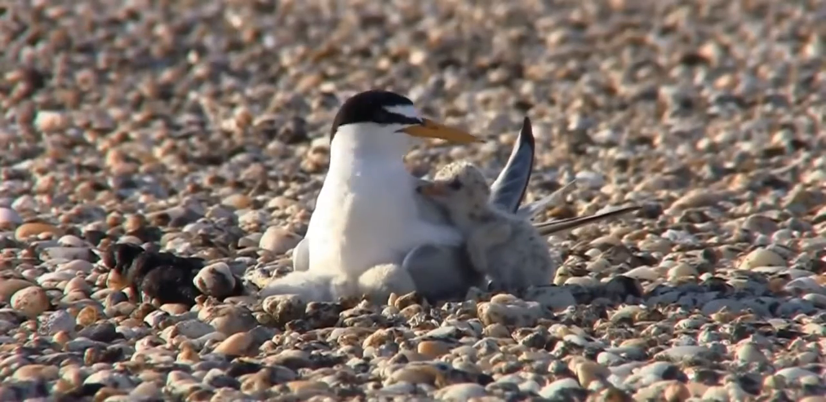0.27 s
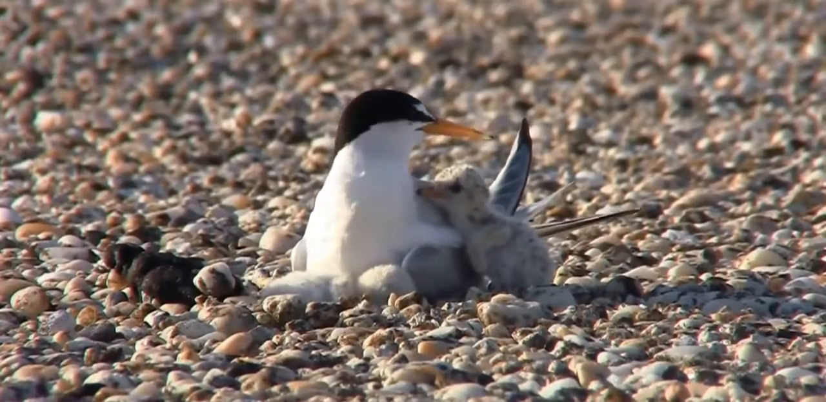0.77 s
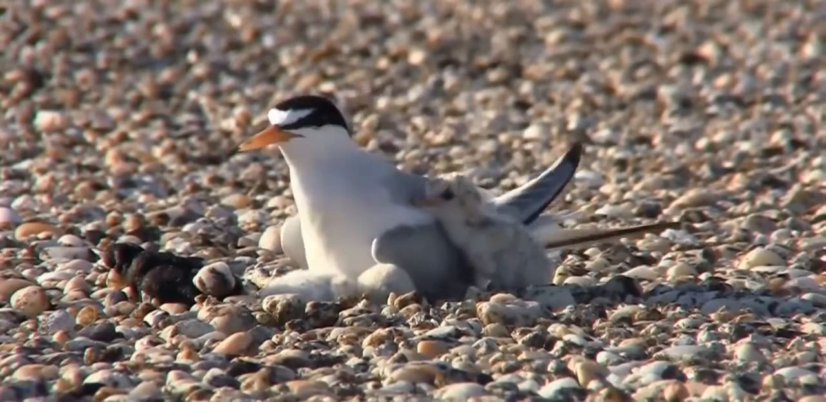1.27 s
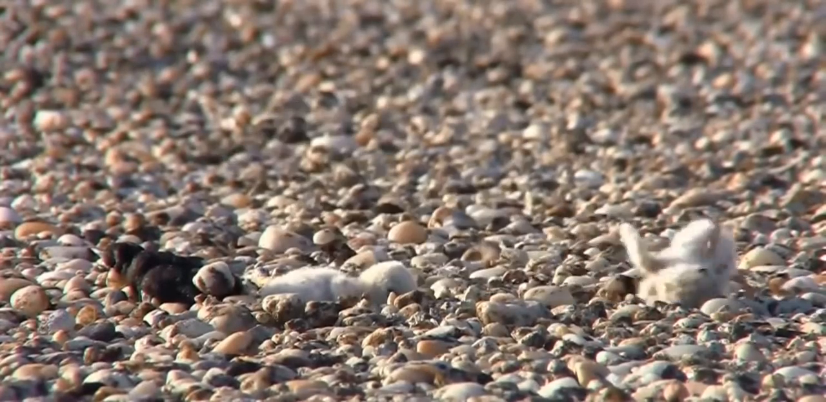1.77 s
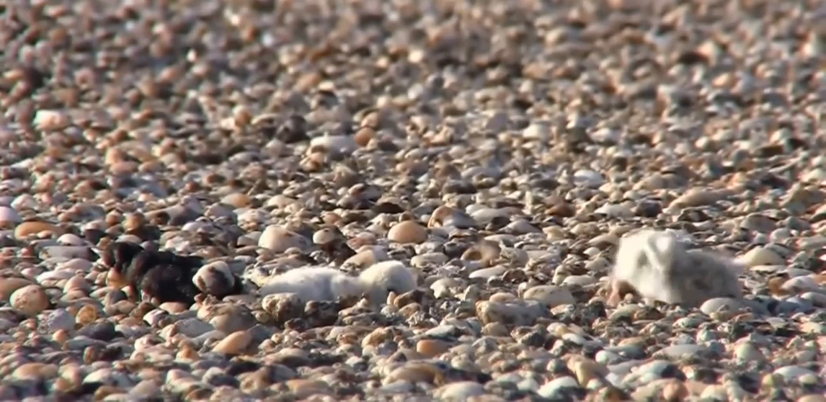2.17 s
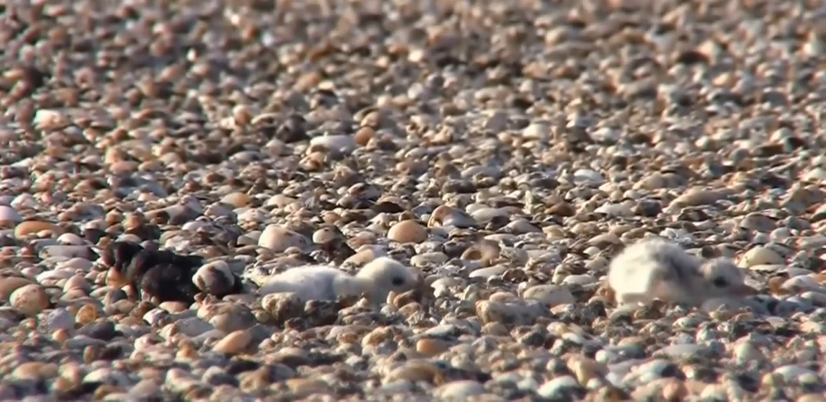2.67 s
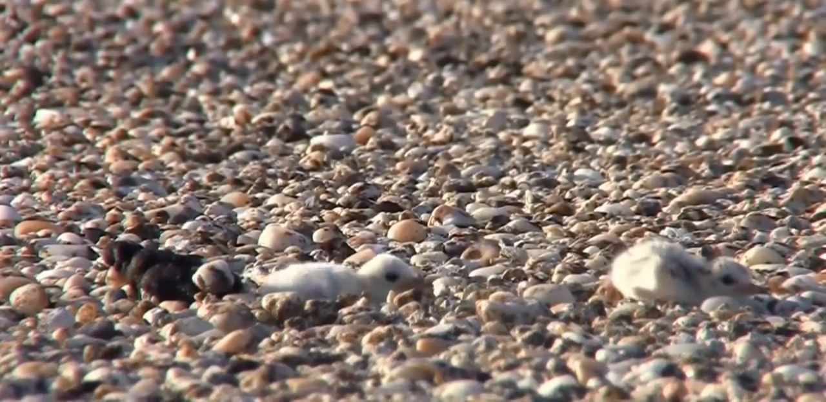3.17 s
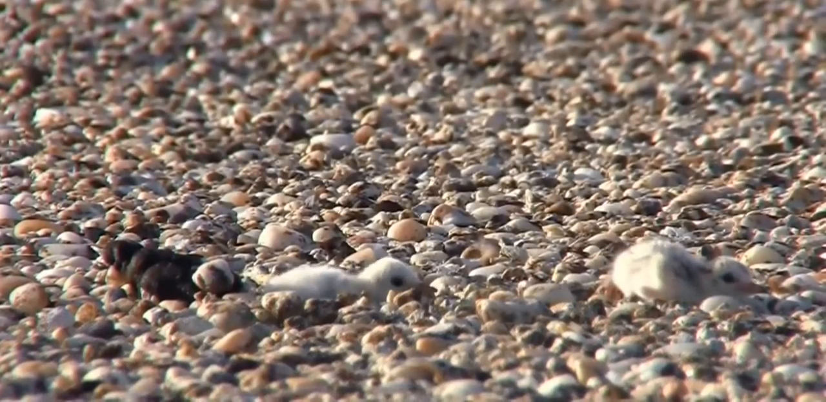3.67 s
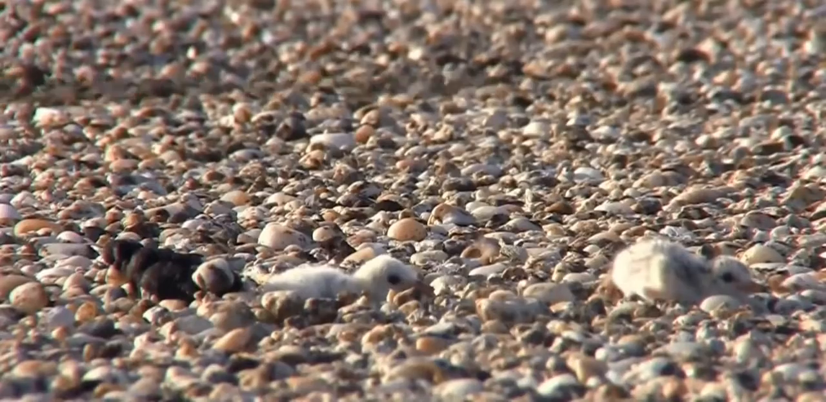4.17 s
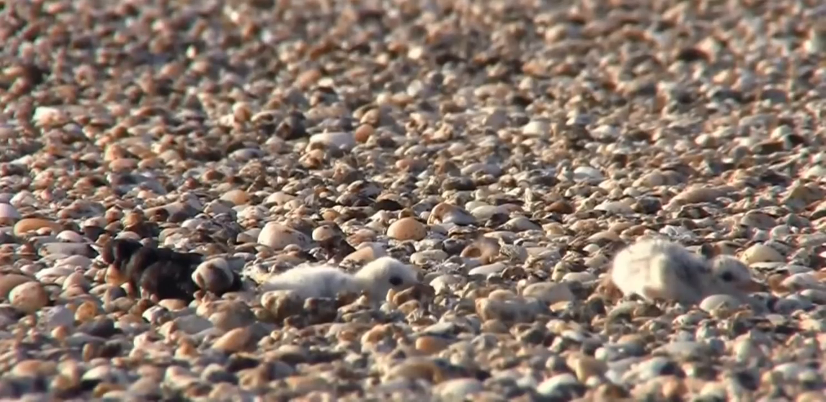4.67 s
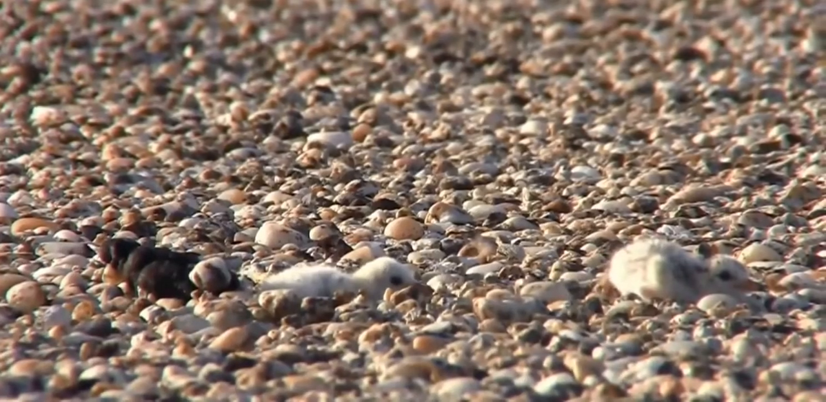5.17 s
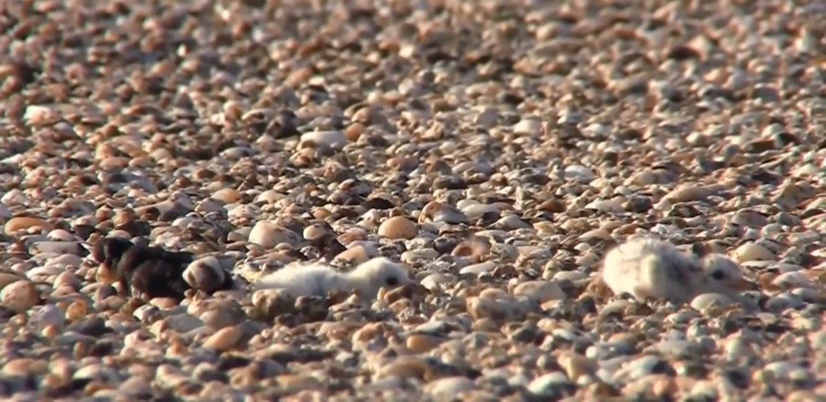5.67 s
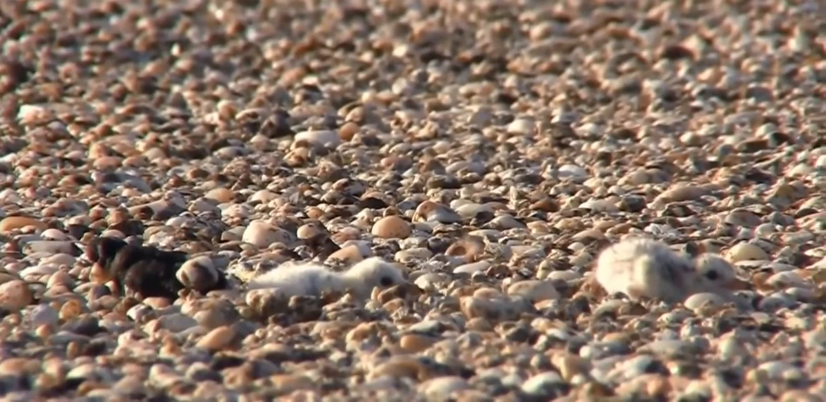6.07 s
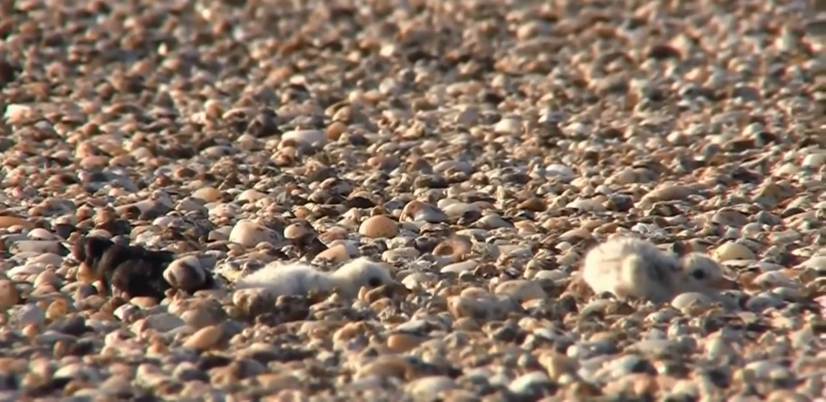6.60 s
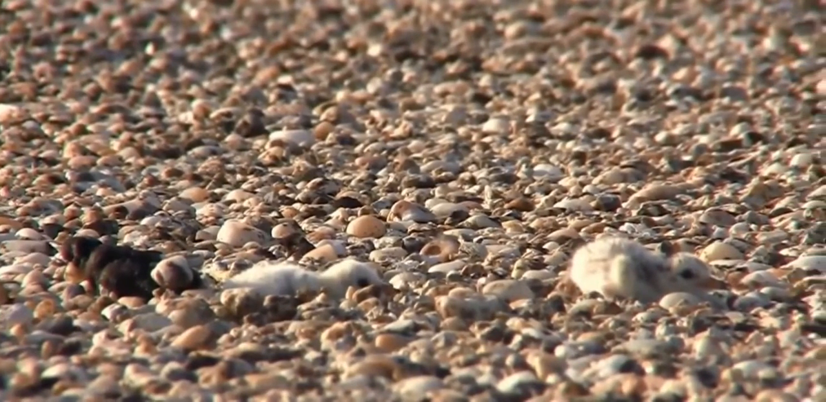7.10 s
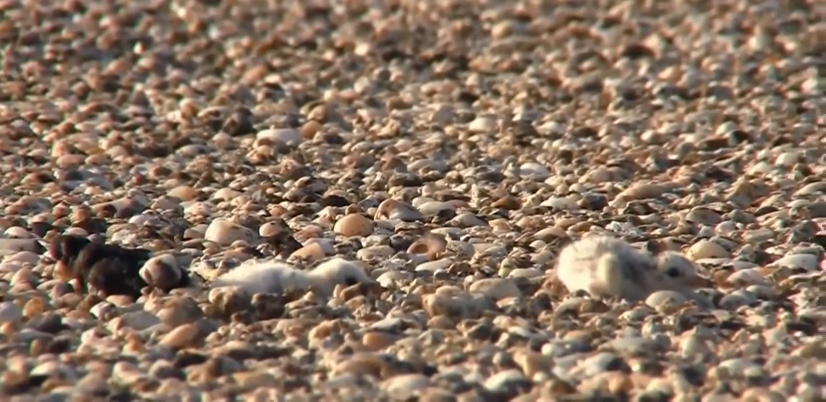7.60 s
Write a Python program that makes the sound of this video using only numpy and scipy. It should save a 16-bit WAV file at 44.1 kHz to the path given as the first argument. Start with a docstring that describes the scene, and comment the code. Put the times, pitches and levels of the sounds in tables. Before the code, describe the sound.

A shingle beach in the open, heard in mono for about eight seconds. A steady, dark distant surf rush with a faint low hum lies under everything, with lumpy wind buffeting that swells near 0, 0.8, 1.3, 4.4 and 7 s. A close tern gives two brief, bright, arched barks at 0.3 and 0.7 s. A gap follows, with faint chips near 1.9 s. From 2.1 s tiny high chirps arrive, with a strong pair near 2.55 s and faint echoes just after. Calls scatter through 3-4 s, then crowd together from 4.2 to 5 s, peaking sharply around 4.75 s. More bright bursts come at 5.7 and 6.4 s, thinning to separate chirps until 7.8 s. Squeaky whistles jump to low raspy croaks, with quick buzzy sweeps at their edges. From 2.4 s, faint runs of fast, even metallic ticks come and go.

```python
"""Small terns over a shingle beach

Terns chirp near and far: short arched notes that jump between registers, with fast buzzy sweeps
at pauses; two notes return as faint echoes, and the nearest bird barks twice. Each voice is a sum
of harmonics coloured by the windpipe. Behind them are a steady distant rush of surf with a faint
hum, made of filtered noise, lumpy low wind noise on the microphone, and runs of small ringing
metallic ticks, probably the lens motor."""
import sys
import numpy as np
from scipy import signal
from scipy.fft import rfft, irfft
from scipy.io import wavfile
from scipy.ndimage import uniform_filter1d

SR = 44100
rng = np.random.default_rng(int(sys.argv[2]) if len(sys.argv) > 2 else 0)


def digitize_waveform(pressure):
    """Quantize a signal to 16-bit integers and store it at the path in sys.argv[1].

    Rows of a 2-D input are taken as channels; values are limited to [-1, 1].
    """
    field = np.atleast_2d(pressure).T
    bounded = np.clip(field, -1, 1)
    quanta = np.round(bounded * 32767).astype(np.int16)
    wavfile.write(sys.argv[1], SR, quanta)


def linear_from_db(decibels):
    """Turn decibels (scalar or array-like) into linear amplitude factors; 0 gives 1."""
    return 10 ** (np.asarray(decibels, float) / 20)


N = 345744


def evened(x):
    """Scales a sound to rms 1."""
    return x / np.sqrt(np.mean(x ** 2) + 1e-20)


def read(points, hz):
    """Reads a spectrum table on a log-frequency axis."""
    f, value = np.transpose(points)
    return np.interp(np.log(hz + 1), np.log(f + 1), value)


def add(mix, s, sound):
    """Mixes a sound in at s seconds."""
    part = mix[max(round(s * SR), 0):][:len(sound)]
    part += sound[:len(part)]


def coloured(points):
    """Steady noise of rms 1 with a given spectrum."""
    spectrum = rfft(rng.standard_normal(N))
    return evened(irfft(spectrum * linear_from_db(read(points, np.fft.rfftfreq(N, 1 / SR))), N))


def narrow(x, hz, width_hz):
    """Keeps a bell-shaped band."""
    f = np.fft.rfftfreq(len(x), 1 / SR)
    return irfft(rfft(x) / (1 + (2 * (f - hz) / width_hz) ** 2), len(x))


# Colour of the distant surf. Each row: frequency in Hz, relative density in dB per Hz.
SURF_COLOUR = [(18, -50), (30, -48), (108, -7), (160, -6.5), (197, -4.5), (256, -8), (532, -11.5),
               (1010, -20), (1900, -35.5), (4000, -33.5), (6720, -39.5), (10000, -51), (15500, -63.5)]
SURF_DB = -24
# Fuzzy hums in the rush. Each row: centre in Hz, width in Hz, level in dB.
HUMS = [(193, 6.4, -30), (1053, 3.1, -44.5)]


def surf():
    """A distant steady rush of coloured noise, with narrow noise bands as hums."""
    mix = linear_from_db(SURF_DB) * coloured(SURF_COLOUR)
    for hz, width_hz, db in HUMS:
        mix += linear_from_db(db) * evened(narrow(rng.standard_normal(N), hz, width_hz))
    return mix


# Colour of wind at the microphone. Each row: frequency in Hz, relative density in dB per Hz.
WIND_COLOUR = [(15, -4.5), (50, 8.5), (110, 11), (160, 6), (300, -66)]
# Gusts at the microphone. Each row: time of the peak in seconds, height over the breeze in dB.
GUSTS = [(.06, 11.5), (.78, 8), (1.32, 10.5), (4.35, 12), (4.95, 5.5), (7.05, 5.5)]
BREEZE_DB, GUST_S, LUMP_DB = -28.5, 0.14, 1.44


def wind():
    """Low buffeting: noise whose level wanders in lumps and rises in a few bell-shaped gusts."""
    lumps = rng.standard_normal(N)
    for _ in range(2):
        lumps = uniform_filter1d(lumps, 2000)
    t = np.arange(N) / SR
    gusts_db = sum(db * np.exp(-((t - s) / GUST_S) ** 2) for s, db in GUSTS)
    return linear_from_db(BREEZE_DB + gusts_db + LUMP_DB * evened(lumps)) * coloured(WIND_COLOUR)


# Runs of ticks. Each row: first tick in seconds, last tick in seconds.
TICK_RUNS = [(2.422, 2.523), (2.799, 2.945), (3.02, 3.27), (3.513, 4.017), (4.085, 4.34), (4.464, 4.665),
             (4.836, 4.937), (5.061, 5.412), (5.486, 5.587), (5.856, 6.11), (6.387, 6.535), (6.61, 6.661),
             (6.808, 6.96), (7.03, 7.081), (7.234, 7.384), (7.607, 7.708)]
# Rings of the small metal parts. Each row: frequency in Hz, relative level in dB.
TICK_MODES = [(5510, -6), (6420, -8), (7190, -5), (8240, -7), (8970, -8)]
TICK_T60_S, BLOW_T60_S = 0.09, 0.034  # time to fall by 60 dB
TICK_GAP_S = 0.05  # adjusted to fit whole steps into a run
TICK_GAIN_DB, TICK_SCATTER_DB = -41, 2


def ticks():
    """Evenly stepped blows on small metal parts: a short noisy rattle and a few fuzzy decaying rings."""
    mix, t = np.zeros(N), np.arange(3000) / SR
    for first, last in TICK_RUNS:
        for s in np.linspace(first, last, round((last - first) / TICK_GAP_S) + 1):
            blow = rng.standard_normal(len(t)) * linear_from_db(-60 * t / BLOW_T60_S)
            rattle = narrow(blow, 5500, width_hz=4700)
            rings = np.zeros(len(t))
            for hz, db in TICK_MODES:
                rings += linear_from_db(db - 60 * t / TICK_T60_S) * np.sin(2 * np.pi * (hz * t + rng.random()))
            # the start of the noisy blow drives the rings and makes them fuzzy
            jolts = signal.fftconvolve(rings, blow[:400] / np.linalg.norm(blow[:400]))[:len(t)]
            gain_db = TICK_GAIN_DB + TICK_SCATTER_DB * rng.standard_normal()
            add(mix, s, linear_from_db(gain_db) * (jolts + 3.4 * rattle))
    return mix


ECHO_DB, ECHO_T60_S = -14, 0.4  # gain of the scatter, time to fall by 60 dB


def echoes(x):
    """Scatter from dunes and shingle: a noisy tail that decays."""
    t = np.arange(SR // 2) / SR
    tail = rng.standard_normal(len(t)) * linear_from_db(-60 * t / ECHO_T60_S) * (t > 0.004)
    return linear_from_db(ECHO_DB) * signal.fftconvolve(x, tail / np.linalg.norm(tail))[:N]


# The windpipe's colour on every harmonic. Each row: frequency in Hz, relative level in dB.
THROAT = [(1000, -14), (1900, -12.5), (2600, -5.5), (3700, 4), (4800, -2), (5800, -9.5), (6700, -15.5),
          (7600, -20.5), (10000, -36), (15000, -50)]
PITCH_SHAKE = 0.07  # share of the pitch, at full roughness
BROKEN_DB = 14  # at full roughness each harmonic comes and goes by this much


def voiced(hz, rough, bright_db, odd_db=0, first_db=0):
    """Harmonics of a pitch curve through the windpipe; roughness shakes pitch and level and breaks them.

    bright_db tilts the colour per octave; odd_db and first_db lift odd harmonics and the first."""
    shake = rng.standard_normal((32, len(hz)))
    shake = evened(signal.fftconvolve(shake, np.hanning(90)[None], "same", axes=1))
    turns = np.cumsum(hz * (1 + PITCH_SHAKE * rough * shake[0])) / SR
    k = np.arange(1, 31)[:, None]  # harmonic numbers
    colour_db = read(THROAT, k * hz) + bright_db * np.log2(k * hz / 3700)
    colour_db += odd_db * (k % 2) + first_db * (k == 1)
    colour_db += BROKEN_DB * rough * shake[2:]
    waves = np.cos(2 * np.pi * (k * turns + rng.random(k.shape)))
    voice = (linear_from_db(colour_db) * (k * hz < 15500) * waves).sum(0)
    return evened(voice) * (1 + rough * shake[1])


# Barks of the nearest bird. Each row: start in seconds, length in seconds, top pitch in Hz,
# level in dB before the arch.
BARKS = [(0.29, 0.04, 1197, -11.5), (0.692, 0.042, 1160, -13.5)]
BARK_SLACK = 0.42  # pitch at both ends as a share of the top
BARK_ECHO_DB = -14  # on top of the echo gain: the nearest bird is the driest


def barks():
    """One arch of pitch and level in the low register, brightened by the wide-open bill."""
    mix = np.zeros(N)
    for s, length, top_hz, db in BARKS:
        arch = np.sin(np.linspace(0, np.pi, round(length * SR)))
        hz = top_hz * (BARK_SLACK + (1 - BARK_SLACK) * arch)
        add(mix, s, linear_from_db(db) * arch * voiced(hz, rough=0.094, bright_db=4.5))
    return mix + echoes(linear_from_db(BARK_ECHO_DB) * mix)


SWEEP_ROUGH, SWEEP_SPREAD = 0.2, 0.1  # the spread shifts each sweep's pitch by chance, as a share
SWEEP_DULL_DB = -1.5  # dB per octave: the bill is not yet open
FLIP_ODD_DB = -24  # odd harmonics drop away, so the voice flips up an octave


def sweep(low_hz, high_hz, length, bright_db):
    """A glide from slack to tight membranes: buzzy, flips register, levels off and is cut short."""
    u = np.linspace(0, 1, round(length * SR))
    spread, flip = rng.uniform(-1.018, 1, 2)
    swell = np.sin(np.pi * u ** 2.6).clip(0) ** 0.8
    hz = (low_hz + (high_hz - low_hz) * np.sin(np.pi / 2 * u)) * (1 + SWEEP_SPREAD * spread)
    odd_db = FLIP_ODD_DB * np.clip((u - 0.55 - 0.4 * flip) / 0.15, 0, 1)
    return voiced(hz, SWEEP_ROUGH, bright_db + SWEEP_DULL_DB, odd_db) * swell


# Notes of the birds near and far; the rows at 2.649 and 2.686 are faint echoes of the notes at
# 2.537 and 2.571. Each row: nominal start in seconds, nominal length in seconds, pitch at the
# middle in Hz before the droop, glide from start to end in Hz, level in dB before the swell.
CHIRPS = [(1.833, 0.012, 1990, 150, -34.5), (1.882, 0.016, 1960, -50, -36), (2.113, 0.015, 3500, -450, -19),
          (2.164, 0.011, 3700, -60, -14.5), (2.196, 0.034, 3450, -650, -30),
          (2.249, 0.028, 1940, 124, -27.5), (2.537, 0.014, 3750, -450, -8), (2.571, 0.025, 3266, 200, -12),
          (2.582, 0.016, 1267, 380, -18.5), (2.604, 0.01, 3460, 197, -25), (2.613, 0.0076, 1945, -700, -20),
          (2.649, .014, 3770, -200, -44), (2.686, 0.023, 3300, 138, -43), (2.779, 0.011, 2093, 398, -22.5),
          (2.786, 0.011, 2750, -300, -26.5), (2.824, 0.028, 3350, -340, -13),
          (2.852, 0.015, 1950, -120, -19.5), (2.866, 0.013, 1330, -300, -28),
          (3.042, 0.052, 3420, -150, -42), (3.185, 0.0092, 915, 22, -21), (3.23, 0.021, 3744, 260, -13),
          (3.278, 0.015, 2750, -180, -25), (3.331, 0.015, 2470, -300, -27),
          (3.462, 0.013, 3530, -630, -16.5), (3.511, 0.008, 3660, 200, -16.5),
          (3.566, 0.022, 3700, -400, -19.5), (3.599, 0.042, 1890, -150, -29.5),
          (3.645, .06, 3600, -54, -37), (3.745, 0.039, 3520, -100, -33.5),
          (3.918, 0.0099, 2790, 192, -27.5), (3.967, 0.024, 2560, -400, -31),
          (4.243, 0.01, 3610, -220, -18.5), (4.292, 0.013, 3560, -200, -16.5),
          (4.419, 0.0086, 3420, -500, -25.5), (4.463, 0.014, 3480, 13, -24),
          (4.475, 0.0086, 3340, -350, -15), (4.521, 0.019, 3450, 130, -14), (4.529, 0.017, 1930, -210, -22),
          (4.557, 0.02, 2030, -210, -23.5), (4.594, 0.05, 3690, -380, -17),
          (4.611, 0.014, 2630, -53, -27.5), (4.635, 0.016, 2160, 221, -19.5), (4.639, 0.0068, 3430, 0, -16),
          (4.665, 0.034, 2690, -100, -26.5), (4.686, 0.0083, 3630, -260, -13),
          (4.732, 0.01, 3750, -430, -6), (4.778, 0.015, 2080, 450, -19), (4.783, .011, 2560, 152, -19),
          (4.796, 0.0094, 3650, 100, -9), (4.806, 0.0067, 1916, -330, -13),
          (4.821, 0.14, 3670, -200, -25.5), (4.966, 0.019, 3470, 29, -17.5), (5.117, 0.01, 3370, 105, -22),
          (5.147, 0.034, 1240, -110, -23.5), (5.348, 0.028, 1020, -120, -24),
          (5.41, 0.046, 3425, -260, -17.5), (5.624, 0.0089, 3800, -450, -13),
          (5.67, 0.0092, 3520, -200, -16.5), (5.69, 0.0084, 3880, -300, -11),
          (5.7, 0.011, 1860, -53, -14.5), (5.742, 0.045, 3770, -310, -8.5),
          (5.744, 0.021, 2570, -420, -29.5), (5.783, 0.011, 2530, -250, -29),
          (5.787, 0.025, 1012, -440, -19.5), (5.864, 0.0065, 2140, -200, -18),
          (5.906, 0.011, 2176, 78, -18.5), (6.369, 0.0059, 2470, -400, -24),
          (6.406, 0.015, 3830, 70, -16.5), (6.439, 0.015, 1915, -150, -11.5),
          (6.496, 0.044, 3690, -320, -13.5), (6.539, 0.026, 1016, -200, -19.5),
          (6.566, 0.011, 1380, -210, -22), (6.585, 0.049, 3300, -320, -24),
          (6.632, 0.021, 3440, -540, -28.5), (6.687, 0.025, 3600, -290, -24.5),
          (6.741, 0.017, 3610, -2, -23), (6.758, 0.016, 3500, -450, -21), (6.815, 0.025, 2570, -450, -28),
          (6.834, 0.017, 1880, -50, -24.5), (6.956, 0.02, 1026, -190, -22.5), (7.01, 0.0072, 3630, 2, -19),
          (7.11, 0.043, 3500, -310, -27.5), (7.236, 0.026, 1940, -300, -24.5),
          (7.293, 0.038, 3580, -200, -24), (7.508, 0.0094, 1077, 10, -20.5),
          (7.552, 0.014, 3610, -160, -16), (7.747, 0.015, 1830, -170, -18.5),
          (7.796, 0.014, 1477, -110, -19), (7.808, 0.029, 3590, -300, -18.5)]
# Phrases with a brighter voice, probably from birds facing the microphone.
# Each row: first moment in seconds, last moment in seconds.
FACING = [(2.1, 2.56), (4.7, 4.82), (6.43, 6.46), (7.7, 7.84)]
# Sweeps into and out of a note. Each holds: lowest pitch in Hz and highest pitch in Hz, both before
# the chance spread, and gain relative to the note in dB.
LEAD_IN = (470, 1140, -3)
LET_GO = (470, 1000, -8)
LEAD_IN_S, LET_GO_S = 0.018, 0.02
DROOP_HZ = 88.4  # every note starts and ends this far under its glide
NEAR_BRIGHT_DB, FACING_DB = 0.23, 2.5  # dB per octave: for each dB of level, and when facing
WHISTLE_HZ, CROAK_HZ = 2250, 1200  # whistles lie above the first, croaks below the second
ROUGH_LOW, ROUGH_HIGH = 0.17, 0.055  # low notes rasp, whistles are smooth
ROUGH_JOINED = 0.33  # croaks that follow without a pause are the harshest
FAR_DB, FAR_ROUGH = -20, 0.35  # fainter whistles blur by this per dB and per second of length
ODD_DB = -2.5  # strong and weak pulses alternate in low notes: odd harmonics are weaker
PURE_DB, FIRST_DB = 8, 7  # whistles not facing: odd harmonics stand out, the first still more
DEEP_HZ, DEEP_SWEEP_DB = 3000, 7  # whistles under this pitch are faint beside their sweeps
NEAR_DRY_DB = 0.5  # echo lost for each dB of level above FAR_DB: near birds sound drier


def terns():
    """Each note glides with drooping ends; after or before a pause the voice sweeps in or out."""
    mix, wet = np.zeros((2, N))
    starts = np.array([row[0] for row in CHIRPS])
    ends = np.array([row[0] + row[1] for row in CHIRPS])
    for s, length, middle_hz, glide_hz, db in CHIRPS:
        whistle = middle_hz >= WHISTLE_HZ
        facing = any(first < s < last for first, last in FACING)
        joined = np.any((ends > s - 0.008) & (ends < s + 0.004))
        bright_db = NEAR_BRIGHT_DB * (db + 13.5) + FACING_DB * facing
        if whistle:
            rough = ROUGH_HIGH + FAR_ROUGH * length * max(FAR_DB - db, 0)
            odd_db, first_db = PURE_DB * (not facing), FIRST_DB * (not facing)
        else:
            rough = ROUGH_JOINED if joined and middle_hz < CROAK_HZ else ROUGH_LOW
            odd_db, first_db = ODD_DB, 0

        u = np.linspace(-1, 1, round((length + 0.00402) * SR))
        swell = np.sin(np.pi * ((1 + u) / 2) ** 0.55).clip(0) ** 0.5
        hz = middle_hz + u * glide_hz / 2 - u ** 2 * DROOP_HZ
        note = linear_from_db(db) * swell * voiced(hz, rough, bright_db, odd_db, first_db)
        add(mix, s - 0.0015, note)
        add(wet, s, note * linear_from_db(NEAR_DRY_DB * min(FAR_DB - db, 0)))

        sweep_db = db + DEEP_SWEEP_DB * (whistle and middle_hz < DEEP_HZ)
        if not joined:
            rising = sweep(*LEAD_IN[:2], LEAD_IN_S, bright_db)
            add(mix, s - LEAD_IN_S, linear_from_db(sweep_db + LEAD_IN[2]) * rising)
        followed = np.any(abs(starts - s - length - 0.002) < 0.006)
        if not followed:
            falling = sweep(*LET_GO[:2], LET_GO_S, bright_db)[::-1]
            add(mix, s + length - 0.002, linear_from_db(sweep_db + LET_GO[2]) * falling)
    return mix + echoes(wet)


def scene():
    """Surf, wind, ticks and birds with their echoes in one channel."""
    return (surf() + wind() + ticks() + barks() + terns())[None]


def low_pass(x):
    """Removes everything above the highest recorded frequency."""
    return signal.sosfilt(signal.butter(12, 15720, fs=SR, output="sos"), x)


def record(dry):
    """Takes the finished mix at the microphone to the file."""
    return low_pass(dry)


dry = scene()
out = record(dry)
digitize_waveform(out)
```